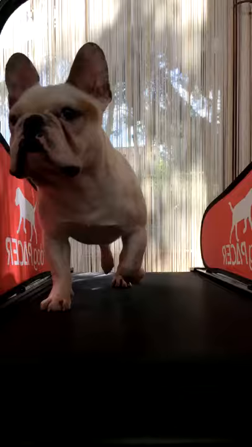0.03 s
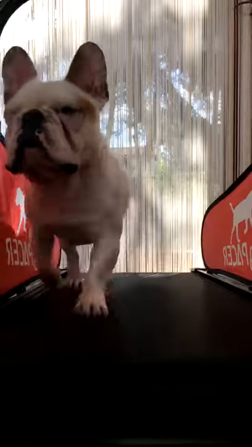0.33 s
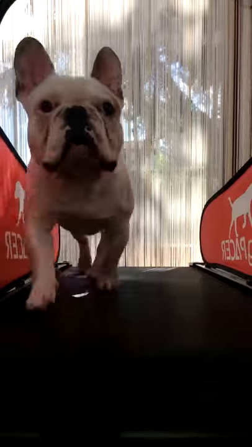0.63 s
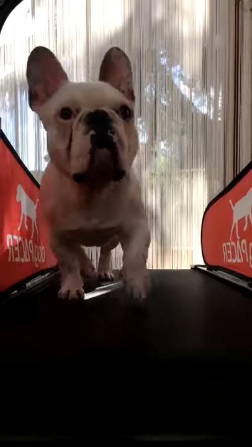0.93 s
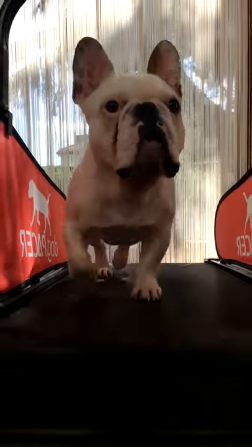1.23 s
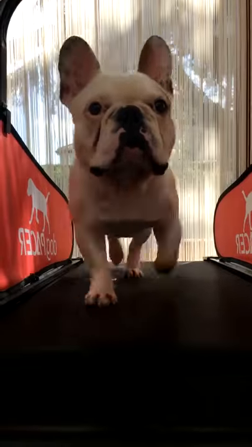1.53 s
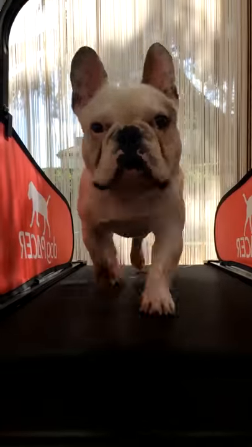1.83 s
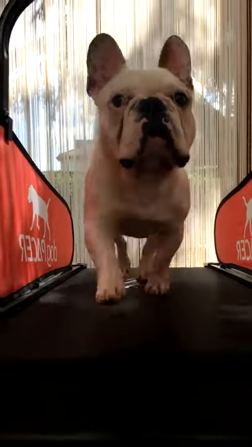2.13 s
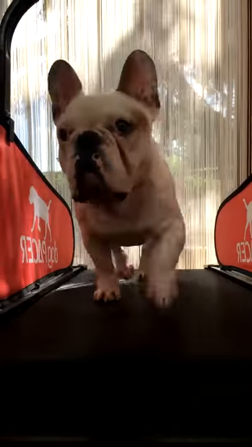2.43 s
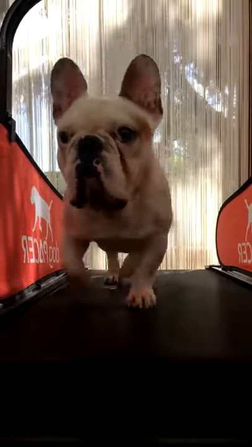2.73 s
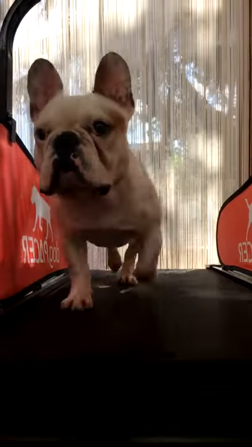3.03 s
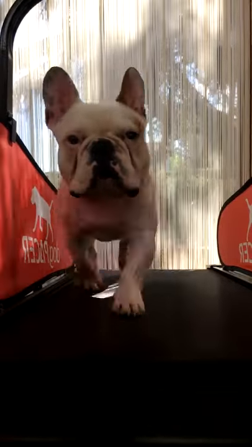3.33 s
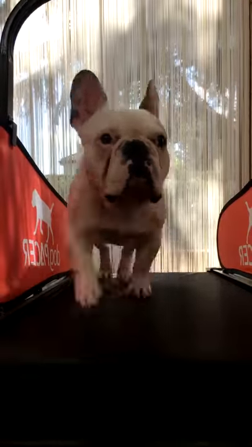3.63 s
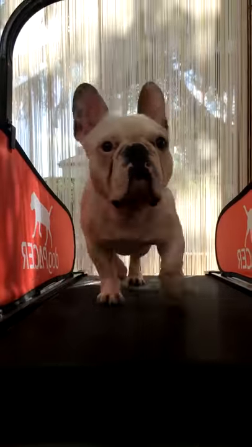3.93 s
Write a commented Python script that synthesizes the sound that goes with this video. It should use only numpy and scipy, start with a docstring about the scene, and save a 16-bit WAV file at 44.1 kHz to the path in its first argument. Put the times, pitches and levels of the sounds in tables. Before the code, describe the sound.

A running treadmill hums steadily indoors, its belt swishing in a quick rhythm. Close to the microphone, a small dog's paws scuff and click throughout, scraping once near the middle and now and then thumping the deck.

```python
"""A small dog walks on a running treadmill, close by, in a room. Its paws scuff the belt; claws catch and ring;
a few footfalls thump the deck. The motor shakes the deck into a rough hum with weak tones and rings its
housing. The belt hisses, swishes in time with the roller, and once drags out a long uneven scrape. The sound
cuts in after a short silence."""
import sys
import numpy as np
from scipy import signal
from scipy.fft import rfft, irfft
from scipy.io import wavfile

SR = 44100
rng = np.random.default_rng(int(sys.argv[2]) if len(sys.argv) > 2 else 0)


def wav_record(signal):
    """Record a signal, one row per channel, as 16-bit PCM in the file named by sys.argv[1]."""
    frames = np.transpose(np.atleast_2d(signal))
    bounded = np.clip(frames, -1, 1)
    # unit amplitude maps onto the largest positive 16-bit level
    quanta = np.round(bounded * 32767).astype(np.int16)
    wavfile.write(sys.argv[1], SR, quanta)


N = 176400

# Noise spectra, shape only: freq_hz, density_db
DECK_SPECTRUM = [(25, -46), (75, -47), (125, -35.5), (165, -30.5), (205, -19.5), (260, -16.5), (335, -6.5),
                 (372, -5.5), (420, -3.5), (545, -5.5), (630, 2), (700, -3), (768, 0.5), (800, 3),
                 (860, 3.5), (920, 1), (965, -6), (1075, -6.5), (1180, -22), (1500, -62), (4000, -43)]
BELT_HISS_SPECTRUM = [(500, -36.5), (1200, 2.5), (1700, 5), (2350, 2), (2750, -5.5), (3050, 1),
                      (4000, -4.5), (4700, 4), (5600, 0.5), (6300, 0), (7200, 0), (8900, 4), (10300, 9),
                      (11700, 3), (13500, -0.5), (15500, -4)]
ROLLER_SWISH_SPECTRUM = [(700, -14), (1300, -0.5), (1800, 5.5), (2750, 1), (3300, 5.5), (4700, 4.5),
                         (5600, 3), (6400, 1.5), (7500, 1), (10300, -22), (15000, -17)]
SCUFF_BODY_SPECTRUM = [(700, -54), (1400, 4.5), (1750, 9.5), (2350, 3.5), (2750, 5), (3100, -6),
                       (4200, -17)]
SCUFF_RASP_SPECTRUM = [(2000, -36), (3050, 2.5), (4000, 5), (4700, 7.5), (5600, -0.5), (6400, 2.5),
                       (8500, -20)]
SCUFF_TICK_SPECTRUM = [(4500, -45), (7000, 1), (9000, 7), (10300, 12.5), (12000, -1), (15500, -11)]
SCRAPE_HISS_SPECTRUM = [(800, -35), (1500, -2), (2200, -25), (3300, 9.5), (4200, -1), (4900, -3), (5600, 5),
                        (6400, 1), (8500, -2), (9500, 2), (10500, 15), (11700, -2), (15000, -10)]
SCRAPE_RUB_SPECTRUM = [(700, -30), (1080, 6.5), (1300, 0), (1550, -2.5), (2100, -16)]
# Envelope of the motor harmonics: freq_hz, relative_db
HUM_ENVELOPE = [(200, -81), (250, -69), (264, -67), (278, -62), (293, -73.5), (308, -75), (322, -57.5),
                (337, -60.5), (352, -78.5), (381, -59), (396, -60.5), (425, -56.5), (454, -55), (469, -88),
                (513, -55.5), (542, -65), (571, -59), (630, -75), (690, -60.5)]
# Motor housing resonances: pitch_hz, width_hz, level_db, pulses_per_turn, pulse_depth
HOUSING_MODES = [(623.3, 6.5, -53, 1, 0), (813, 13.4, -44, 1, 0.2), (844, 13, -48, 2, 0.33),
                 (904.6, 13, -43.5, 2, 0.3), (1678, 6.1, -64, 1, 0.54), (2910, 10.5, -68.5, 1, 0.4)]
# Frame resonances: centre_hz, width_hz, boost_db
FRAME_MODES = [(1545, 40, 3), (1680, 50, 2.5), (2340, 80, 2.5), (3070, 70, 4), (3650, 120, 2),
               (4170, 50, 2.5), (4530, 80, 3.5), (4910, 70, 3.5), (5100, 70, 2.5), (6130, 90, 2.5),
               (6450, 140, 2.5), (8250, 500, 2)]
# Footfalls on the deck: start_s, relative_db
FOOTFALLS = [(0.326, -37), (0.399, -36), (1.63, -37), (1.699, -32), (1.803, -38), (1.893, -35),
             (3.205, -32), (3.268, -38), (3.639, -27.5)]
# Claw catches: start_s, decay_s, pitch_hz, relative_db
CLAW_CATCHES = [(0.325, 0.0076, 1800, -44), (0.67, .011, 4600, -53), (0.82, 0.027, 1680, -45.5),
                (1.335, 0.0094, 2500, -37.5), (1.448, 0.04, 1750, -34.5), (1.448, .032, 2950, -37.5),
                (1.541, .011, 2310, -35.5), (1.546, .009, 2990, -41), (1.55, 0.022, 4900, -39),
                (1.764, 0.0048, 4683, -26.5), (1.766, 0.0025, 9950, -36), (1.765, 0.0096, 2280, -33.5),
                (1.77, .004, 3030, -35), (2.127, .01, 1900, -37.5), (2.339, 0.0092, 1830, -40),
                (2.393, .0097, 2430, -37.5), (2.49, .013, 2520, -40), (2.828, 0.0098, 2390, -38.5),
                (3.355, 0.0096, 2240, -33), (3.699, 0.013, 3060, -36.5)]
# Paw scuffs, relative levels: start_s, decay_s, body_db, rasp_db, tick_db
PAW_SCUFFS = [(0.317, 0.0093, -40.5, -43, -51), (0.41, 0.01, -47, -45.5, -43),
              (0.525, .007, -44, -38.5, -36.5), (0.63, 0.02, -41, -39, -44),
              (0.666, 0.015, -60, -35.5, -43), (0.743, .0065, -42, -40, -35),
              (0.795, 0.018, -41, -40.5, -39.5), (0.84, 0.017, -45, -42.5, -46),
              (0.953, 0.0084, -48, -44, -45), (1.01, 0.013, -42.5, -42.5, -40.5),
              (1.034, 0.031, -42, -42.5, -43), (1.159, .02, -45, -44, -48), (1.249, 0.015, -46, -42, -39.5),
              (1.268, 0.011, -39.5, -42.5, -54), (1.333, .008, -52, -44, -38.5),
              (1.434, .011, -39, -37, -34.5), (1.442, 0.047, -52, -36.5, -52),
              (1.54, 0.0071, -55, -34.5, -35), (1.68, 0.011, -45, -43, -38.5),
              (1.698, 0.0084, -46, -40, -39), (1.76, .0048, -51, -34, -33), (1.805, 0.013, -44, -38.5, -38),
              (1.888, 0.025, -47.5, -42.5, -41.5), (1.91, 0.014, -44.5, -41.5, -41),
              (2.018, .01, -45, -44, -40), (2.11, 0.0041, -43, -41, -35), (2.119, .014, -44, -40, -50),
              (2.339, 0.013, -40, -45, -40.5), (2.394, 0.016, -50, -41, -44),
              (2.447, 0.019, -49, -41.5, -44.5), (2.491, 0.028, -44, -47, -46),
              (2.541, 0.024, -45.5, -42.5, -44), (2.651, 0.037, -49, -42, -39.5),
              (2.757, 0.028, -44.5, -43, -46), (2.826, 0.017, -52, -40.5, -40.5),
              (2.871, 0.012, -46, -41.5, -39), (2.917, 0.024, -43, -44, -41.5),
              (3.091, .007, -44, -41.5, -36), (3.196, 0.015, -44, -46, -43),
              (3.309, 0.024, -48, -42.5, -41.5), (3.353, .007, -34, -35, -34.5),
              (3.412, 0.02, -47, -40.5, -41.5), (3.526, 0.037, -51, -44, -44),
              (3.63, .02, -45.5, -41.5, -44), (3.697, 0.011, -40, -34.5, -35),
              (3.746, 0.026, -45, -40, -45), (3.832, 0.017, -46, -42.5, -39), (3.952, 0.026, -44, -45, -53)]

BIN_HZ = np.arange(N // 2 + 1) * SR / N


def undb(db):
    """Decibels to gain."""
    return 10 ** (np.asarray(db) / 20)


def colour(x, spectrum):
    """Shape x by a spectrum; rms 1."""
    hz, db = np.array(spectrum).T
    gain_db = np.interp(np.log(np.maximum(BIN_HZ, 1)), np.log(hz), db)
    y = irfft(rfft(x) * undb(gain_db), N)
    return y / y.std()


def noise(spectrum):
    """Coloured noise; rms 1."""
    return colour(rng.standard_normal(N), spectrum)


def wander(bandwidth_hz):
    """Smooth random drift; mean 0, rms 1."""
    lowpass = np.exp(-(BIN_HZ / bandwidth_hz) ** 2) * (BIN_HZ > 0)
    y = irfft(rfft(rng.standard_normal(N)) * lowpass, N)
    return y / y.std()


def burst(age_s, attack_s, decay_s):
    """Linear rise, exponential fall."""
    return np.clip(age_s / attack_s, 0, 1) * np.exp(-np.maximum(age_s - attack_s, 0) / decay_s)


def room(x, t60_s=0.25, tail_db=-6, gap_s=0.008):
    """Direct sound plus a short diffuse tail."""
    t = np.arange(SR // 2) / SR
    tail = rng.standard_normal(len(t)) * np.exp(-np.log(1000) * t / t60_s) * (t > gap_s)
    return x + undb(tail_db) * signal.fftconvolve(x, tail / np.linalg.norm(tail))[:N]


def frame(friction, gain_db=-0.5, low_cut_hz=130):
    """The frame lifts narrow bands of whatever rubs on the belt and radiates no bass."""
    boost_db = sum(db / (1 + (2 * (BIN_HZ - hz) / width_hz) ** 2) for hz, width_hz, db in FRAME_MODES)
    highpass = BIN_HZ ** 2 / (BIN_HZ ** 2 + low_cut_hz ** 2)
    return irfft(rfft(friction) * undb(gain_db + boost_db) * highpass, N)


def belt(t, roller_hz=8.2, roller_offset_s=0.082, swish_db=-51, hiss_db=-48):
    """Flickering hiss of the sliding belt; a swish swells once and twice per roller turn."""
    angle = 2 * np.pi * roller_hz * (t - roller_offset_s)
    once_db = 1.6 * np.cos(angle)
    twice_db = 2.7 * (np.cos(2 * angle) - 0.4 * np.sin(4 * angle))  # skewed: fast rise, slow fall
    swish = undb(once_db + twice_db + 0.8 * wander(36)) * noise(ROLLER_SWISH_SPECTRUM)
    hiss = undb(hiss_db + 1.5 * wander(160)) * noise(BELT_HISS_SPECTRUM)
    return undb(swish_db) * swish / swish.std() + hiss


def motor_hum(turns, motor_hz, gain_db=0.5):
    """Close low tones locked to the motor's rotation."""
    hz, db = np.array(HUM_ENVELOPE).T
    out = np.zeros(N)
    for harmonic in range(14, 48):
        rms_db = np.interp(harmonic * motor_hz, hz, db) + gain_db
        out += undb(rms_db) * np.sin(2 * np.pi * (harmonic * turns + rng.random()))
    return np.sqrt(2) * out


def motor_housing(t, turns, flutter_hz=56.8, flutter_depth=0.33):
    """Evenly driven narrow resonances that pulse with the motor and flutter faster."""
    out = np.zeros(N)
    flutter = 1 + flutter_depth * np.cos(2 * np.pi * flutter_hz * t)
    for hz, width_hz, db, pulses_per_turn, depth in HOUSING_MODES:
        phasor = wander(2 * width_hz) + 1j * wander(2 * width_hz)
        phasor /= np.sqrt(1 + abs(phasor) ** 2)  # soft limit
        pulse = 1 + depth * np.cos(2 * np.pi * pulses_per_turn * turns)
        ring = np.real(phasor * np.exp(2j * np.pi * hz * t)) * pulse * flutter
        out += undb(db) * ring / ring.std()
    return out


def deck_rumble(turns, gain_db=-40, throb_depth=0.11, rattle_gain=0.28, scatter_db=3.5):
    """The motor shakes the deck: throbbing rumble and one small knock per turn."""
    angle = 2 * np.pi * turns
    throb = 1 + throb_depth * (np.cos(angle) + 0.53 * np.cos(2 * angle) + 0.75 * np.cos(7 * angle))
    knocks = np.diff(np.floor(turns), prepend=0)
    knocks *= undb(scatter_db * rng.standard_normal(N)) * rng.choice([-1, 1], N)
    rumble = colour(rng.standard_normal(N) * throb, DECK_SPECTRUM)
    return undb(gain_db) * (rumble + rattle_gain * colour(knocks, DECK_SPECTRUM))


def footfalls(t, attack_s=0.0032, decay_s=0.0085):
    """The dog's weight lands and briefly shakes the deck."""
    push = sum(undb(db) * burst(t - start_s, attack_s, decay_s) for start_s, db in FOOTFALLS)
    return push.std() * colour(push * rng.standard_normal(N), DECK_SPECTRUM)


def long_scrape(t, hiss_db=-38.3, rub_db=-36.5):
    """One long uneven scrape: hiss swells and dies over a dull rub that builds until it suddenly lets go."""
    start_s, peak_s, end_s = 1.39, 1.594, 1.68
    release_s, rise_s, fall_s = 1.604, 0.053, 0.021
    hiss_envelope = np.interp(t, (start_s, peak_s, end_s), (0, 1, 0))
    rub_envelope = np.exp(np.minimum((t - release_s) / rise_s, (release_s - t) / fall_s))
    hiss = undb(hiss_db) * hiss_envelope * noise(SCRAPE_HISS_SPECTRUM)
    rub = undb(rub_db) * rub_envelope * noise(SCRAPE_RUB_SPECTRUM)
    return (hiss + rub) * undb(2 * wander(60))


def claws(t, width_hz=110, attack_s=0.003, gain_db=-2, roughness_db=1.5):
    """A claw catches on the belt and briefly drives a damped resonance into a rough squeak."""
    pole = np.exp(-np.pi * width_hz / SR)
    phasor = signal.lfilter([1], [1, -pole], wander(1800) + 1j * wander(1900))
    phasor /= np.sqrt(phasor.var() / 2 + abs(phasor) ** 2)  # soft limit
    out = np.zeros(N)
    for start_s, decay_s, hz, db in CLAW_CATCHES:
        tone = np.real(phasor * np.exp(2j * np.pi * hz * t))
        out += undb(db) * burst(t - start_s, attack_s, decay_s) * tone / tone.std()
    return out * undb(gain_db + roughness_db * wander(430))


def paw_scuffs(t, attack_s=0.0041, body_lag_s=0.0041, gain_db=-2.5, grit_db=2.5):
    """Gritty bursts of paw friction: bright tick and rasp first, the body just after."""
    starts_s, decays_s, body_db, rasp_db, tick_db = np.array(PAW_SCUFFS).T
    out = np.zeros(N)
    for spectrum, levels_db, lag_s in ((SCUFF_BODY_SPECTRUM, body_db, body_lag_s),
                                       (SCUFF_RASP_SPECTRUM, rasp_db, 0),
                                       (SCUFF_TICK_SPECTRUM, tick_db, 0)):
        power = np.zeros(N)
        for start_s, decay_s, db in zip(starts_s, decays_s, levels_db):
            power += (undb(db) * burst(t - start_s - lag_s, attack_s, decay_s)) ** 2
        out += np.sqrt(power) * noise(spectrum)
    return out * undb(gain_db + grit_db * wander(680))


def scene():
    """Treadmill and dog, mono; all rubbing rings through the frame."""
    t = np.arange(N) / SR
    motor_hz, waver_turns = 14.65, 0.004
    turns = motor_hz * t + waver_turns * wander(3.2)
    dog_friction = paw_scuffs(t) + claws(t) + long_scrape(t)
    deck = deck_rumble(turns) + footfalls(t)
    motor = motor_hum(turns, motor_hz) + motor_housing(t, turns)
    return (deck + motor + frame(room(dog_friction) + belt(t)))[None]


def record(dry, start_s=0.2582, ramp_s=0.0023, quiet_db=-5.5, rise_span_s=(0.314, 0.3343), top_hz=15500):
    """Cut in from silence, briefly quiet, then full level; steep low-pass."""
    t = np.arange(N) / SR
    gate = np.clip((t - start_s) / ramp_s, 0, 1)
    gain = undb(np.interp(t, rise_span_s, (quiet_db, 0)))
    lowpass = signal.ellip(12, 0.2, 80, top_hz, fs=SR, output="sos")
    return signal.sosfilt(lowpass, dry * gate * gain)


dry = scene()
out = record(dry)
wav_record(out)
```